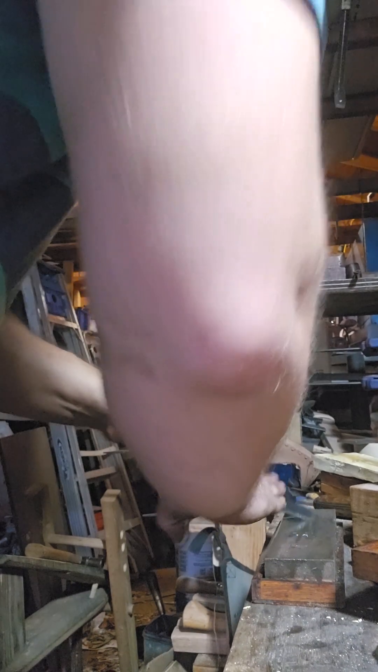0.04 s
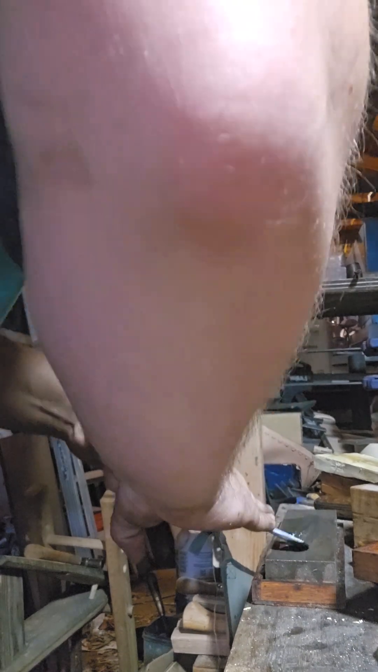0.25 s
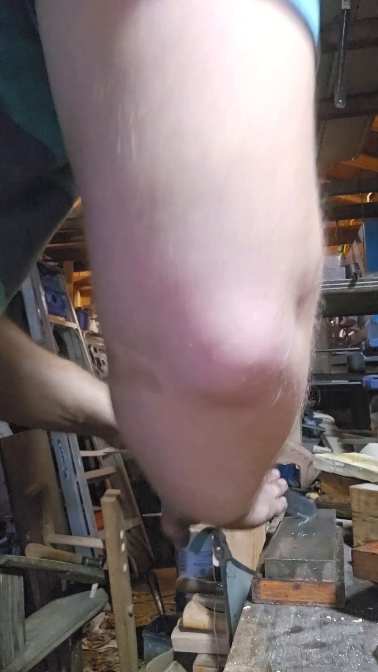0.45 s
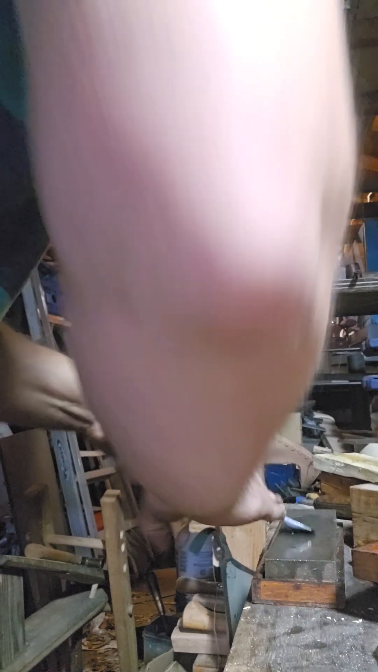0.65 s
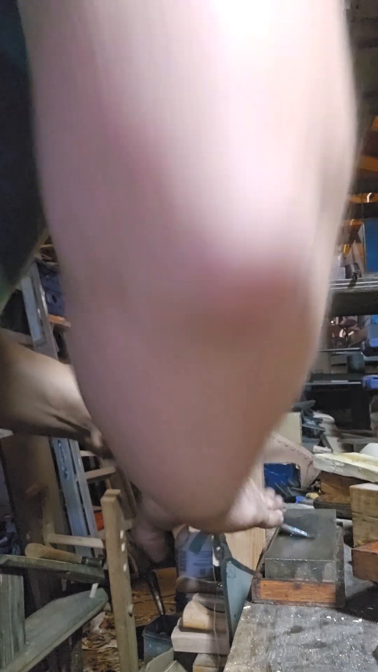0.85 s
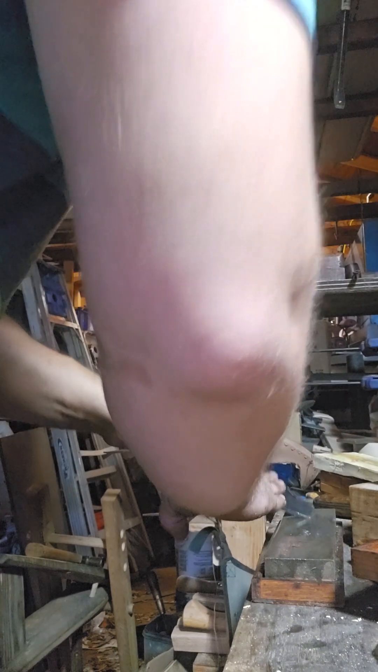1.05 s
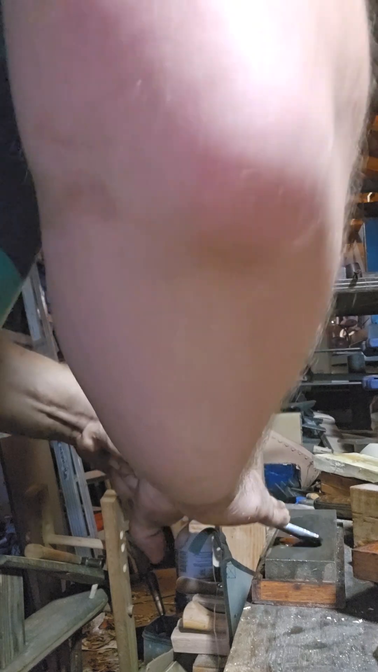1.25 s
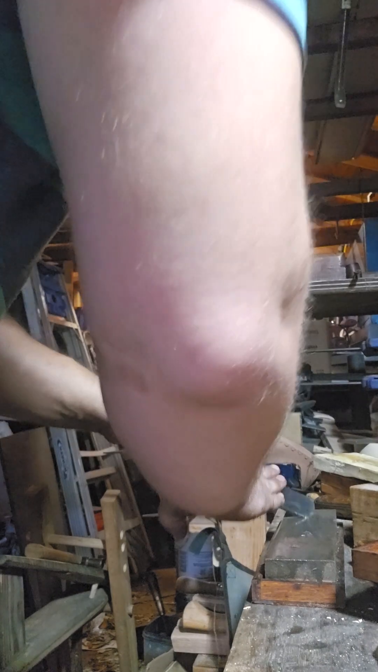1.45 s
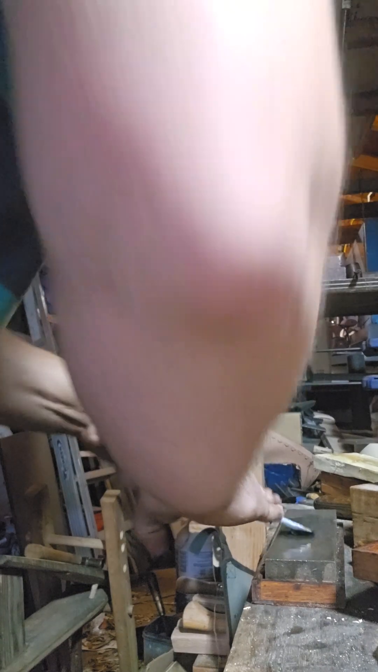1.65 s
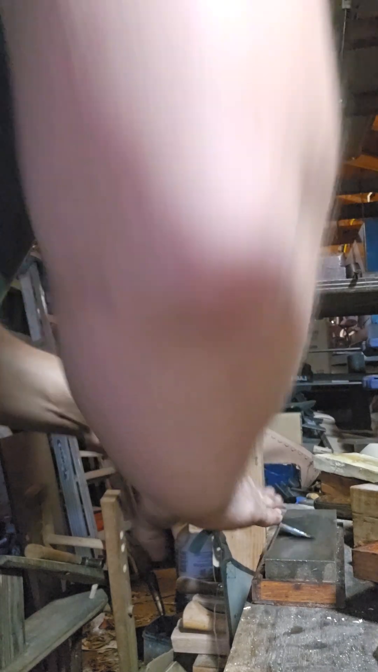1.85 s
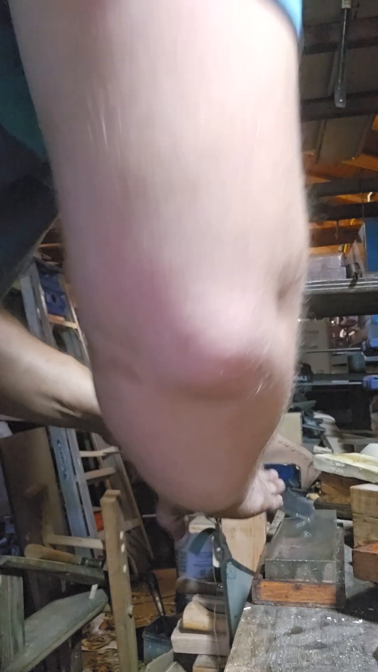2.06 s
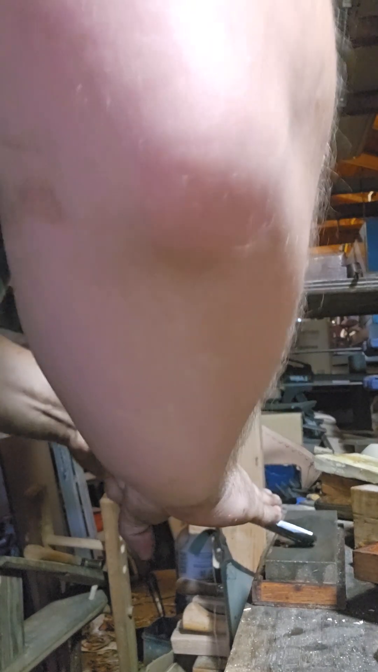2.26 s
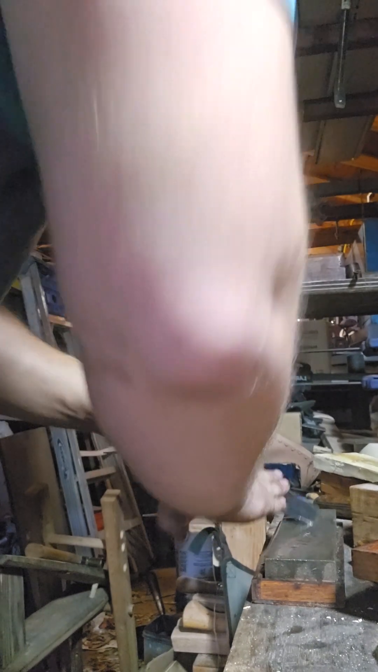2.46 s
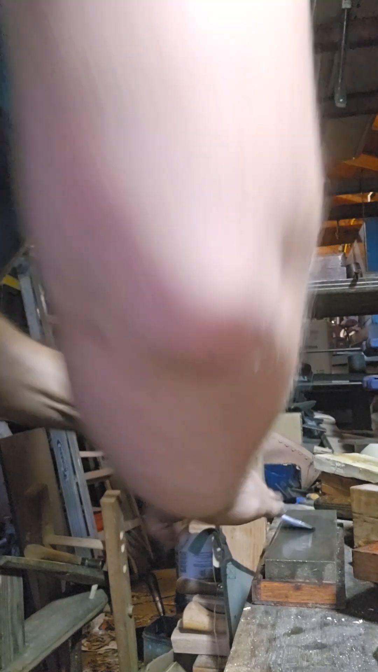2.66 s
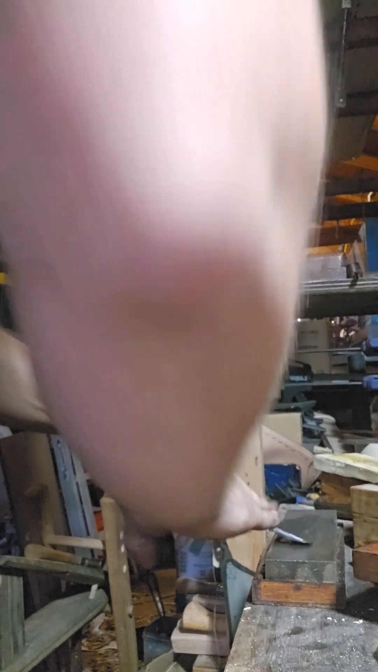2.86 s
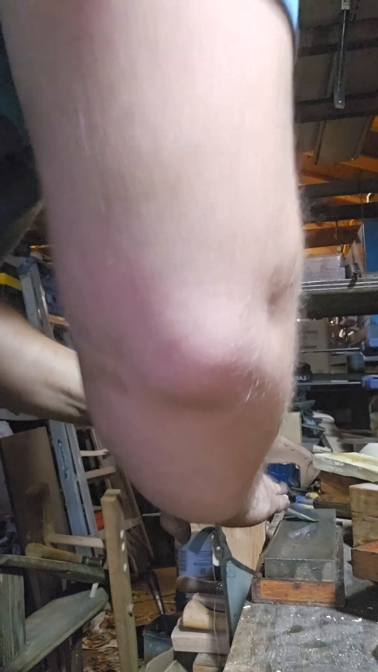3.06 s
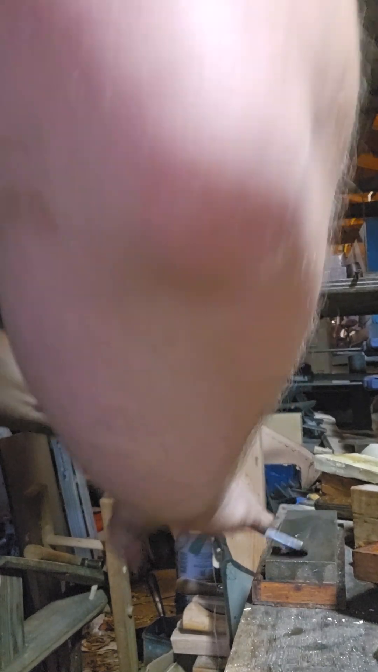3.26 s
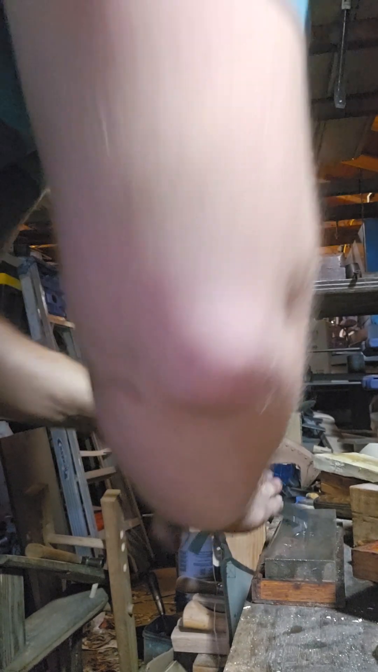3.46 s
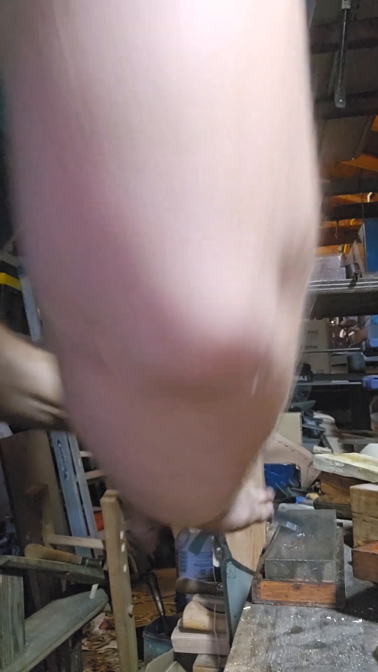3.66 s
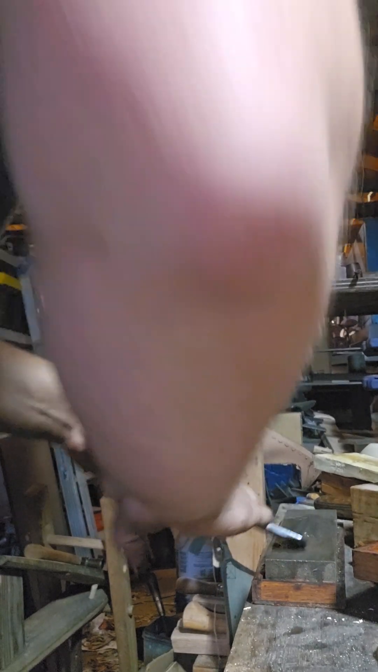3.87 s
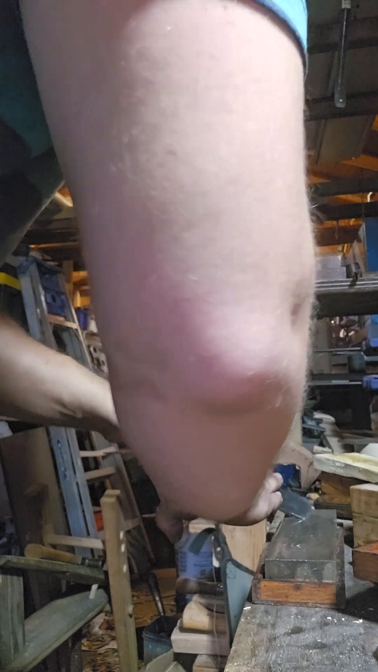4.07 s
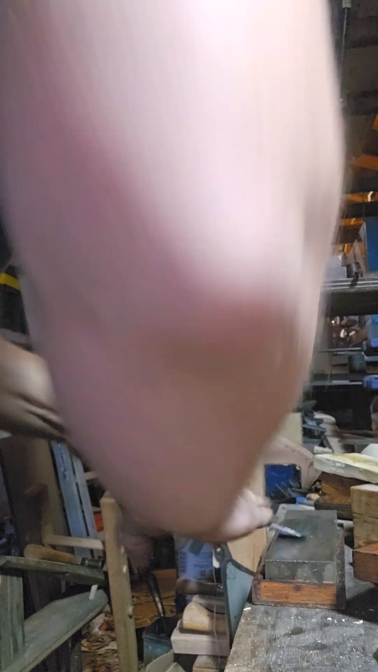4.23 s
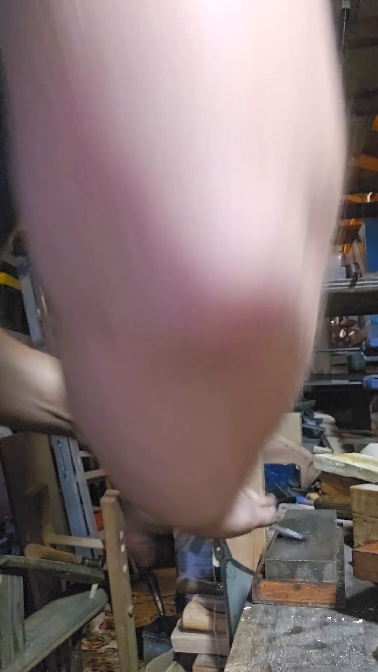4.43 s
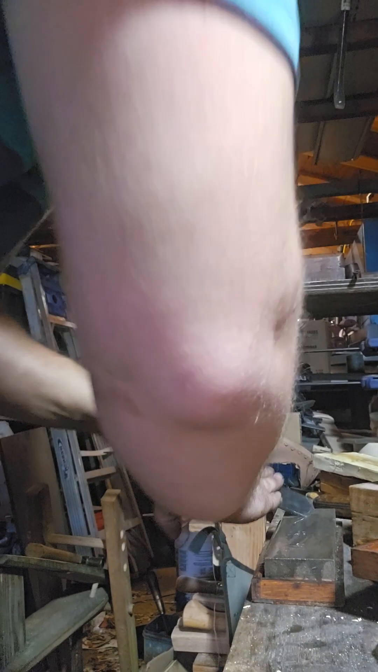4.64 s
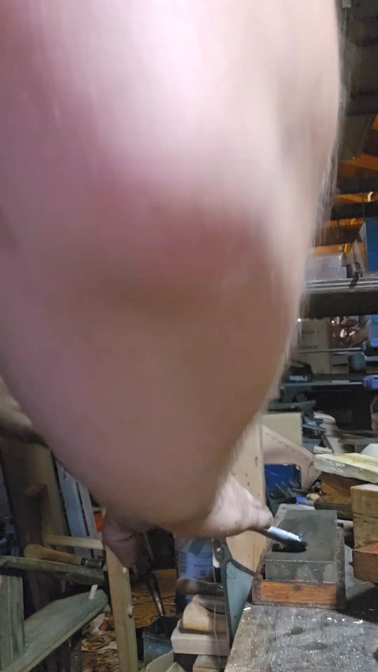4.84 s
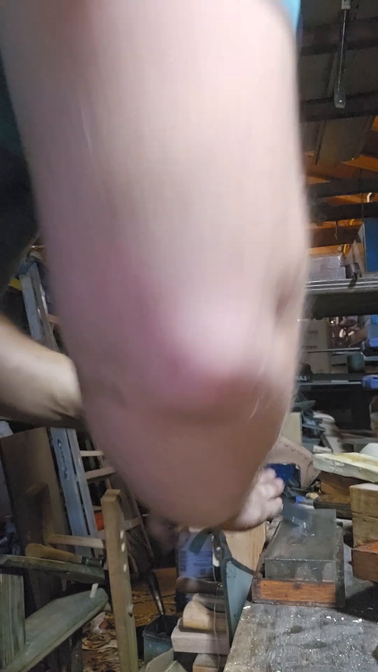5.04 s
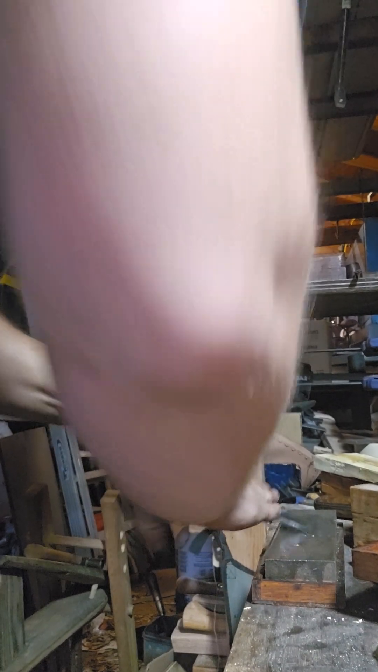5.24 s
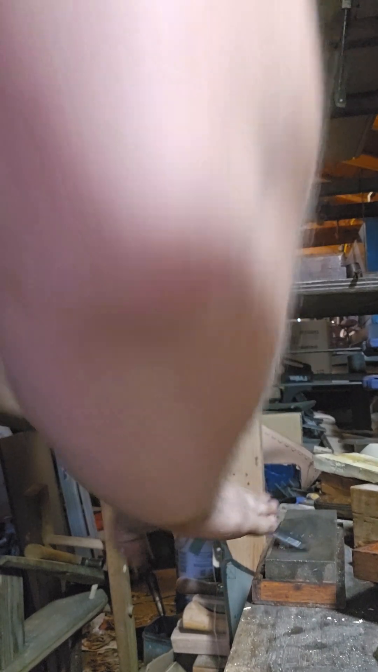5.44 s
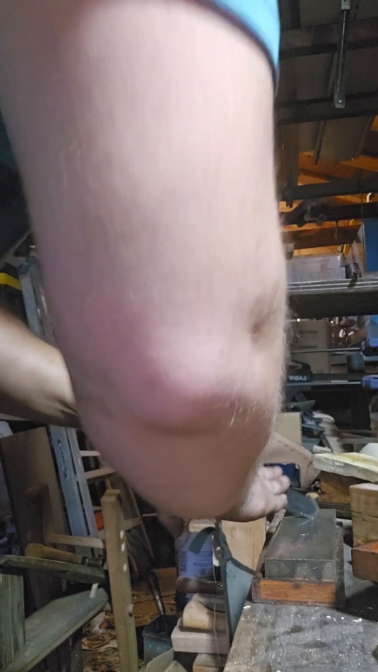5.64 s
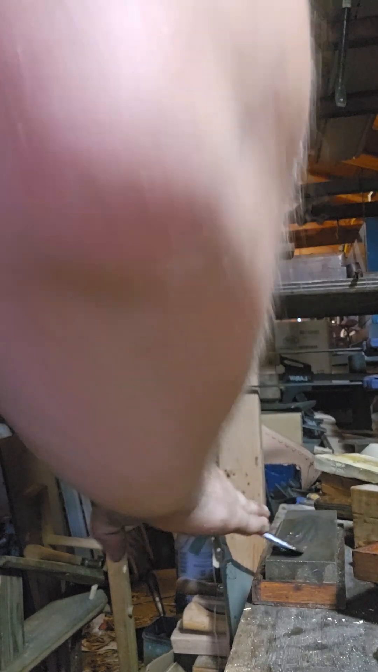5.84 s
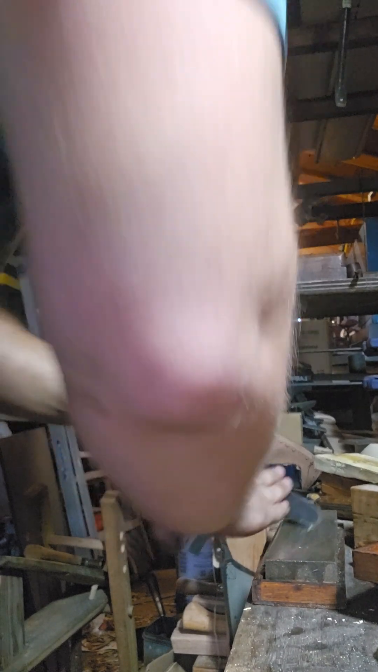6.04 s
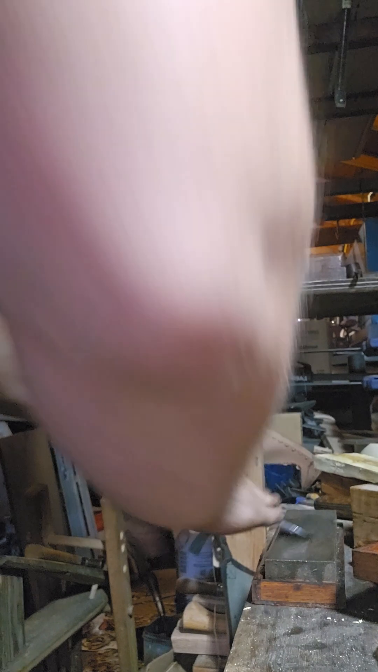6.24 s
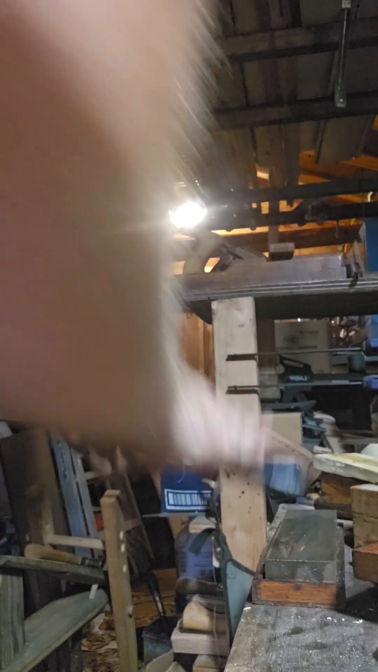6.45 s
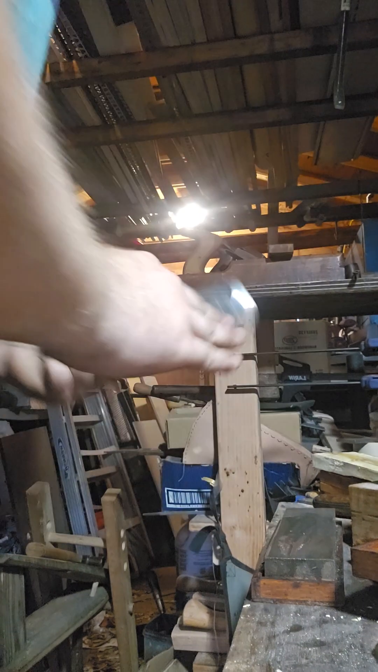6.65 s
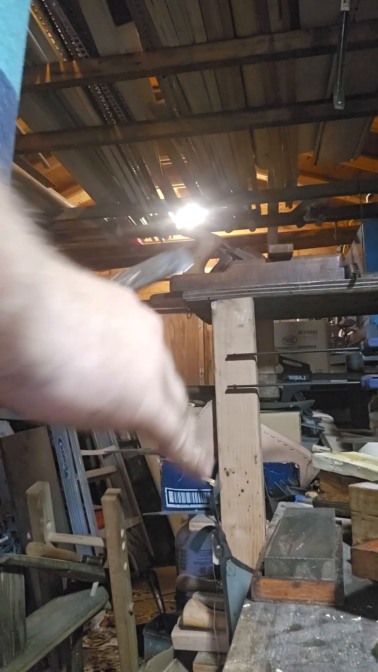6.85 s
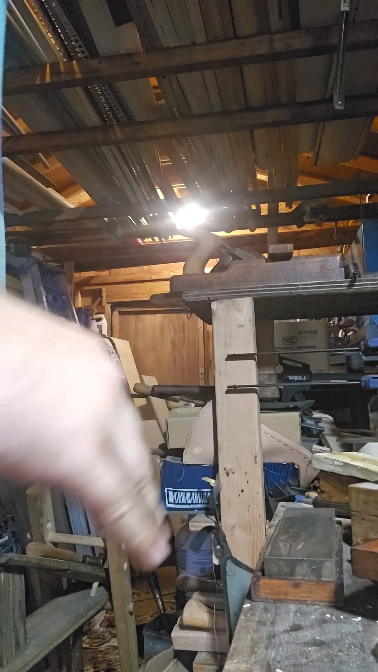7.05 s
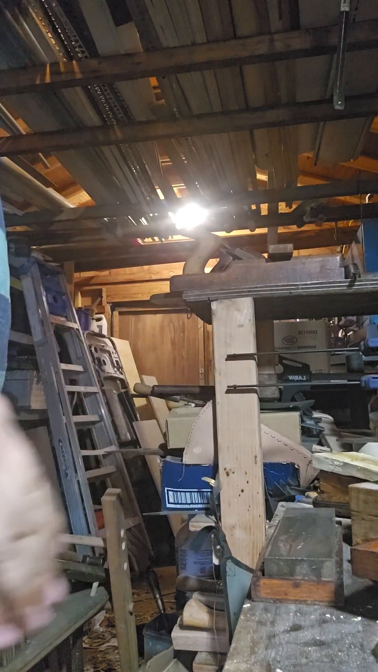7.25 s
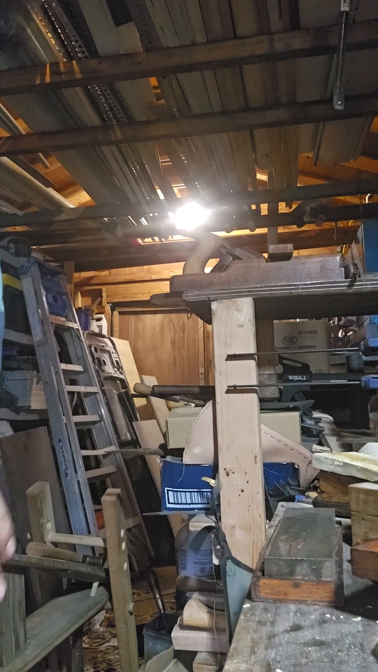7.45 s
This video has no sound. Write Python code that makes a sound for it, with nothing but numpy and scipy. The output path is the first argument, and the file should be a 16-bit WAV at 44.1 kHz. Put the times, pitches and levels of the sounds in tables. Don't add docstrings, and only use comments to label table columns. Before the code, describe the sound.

A steel blade rasps rapidly back and forth on a coarse sharpening stone, bright and gritty, then stops with a rustle and a wooden knock.

```python
import sys
import numpy as np
from scipy import signal
from scipy.fft import rfft, irfft, next_fast_len
from scipy.io import wavfile
from scipy.ndimage import uniform_filter1d, map_coordinates

SR = 44100
rng = np.random.default_rng(int(sys.argv[2]) if len(sys.argv) > 2 else 0)


def attenuation_scalar(level_db):
    decades = np.asarray(level_db, float) / 20
    return 10 ** decades


def unload_audio(sound):
    columns = np.transpose(np.atleast_2d(sound))
    steps = np.round(np.clip(columns, -1, 1) * 32767)
    wavfile.write(sys.argv[1], SR, steps.astype(np.int16))


N = 330735
SIZE = next_fast_len(N + SR)
HZ = np.arange(SIZE // 2 + 1) * SR / SIZE
TIME = np.arange(N) / SR


def colour(points_hz, points_db):
    return attenuation_scalar(np.interp(np.log(HZ + 1), np.log(points_hz), points_db))


def modes(table, order, flip):
    total = 0
    for k, row in enumerate(table):
        hz, width_hz, level_db = row[0], row[1], row[2 + order]
        total = total + flip ** k * attenuation_scalar(level_db) / (1 + 2j * (HZ - hz) / width_hz)
    return total


def shape(x, gain):
    return irfft(rfft(x, SIZE) * gain, SIZE)[..., :N]


def unit(x):
    return x / np.sqrt(np.mean(x ** 2))


def unit_power(response):
    return response / np.sqrt(np.mean(abs(response) ** 2))


def walk(rate):
    hold = int(SR / rate)
    levels = np.repeat(rng.standard_normal(N // hold + 1), hold)
    return 1.465 * uniform_filter1d(levels, hold)[:N]


def tail(t60_s, db, start_s):
    t = np.arange(SR // 2) / SR
    echoes = rng.standard_normal(len(t)) * attenuation_scalar(-60 * t / t60_s) * (t > start_s)
    return rfft(attenuation_scalar(db) * echoes / np.sqrt(np.sum(echoes ** 2)), SIZE)


def path(lag):
    direct = np.exp(-2j * np.pi * HZ * lag / SR)
    quick = tail(0.013, 1.0, 0.00046)
    room = tail(0.19, -5.0, 0.0072) / (1 + (HZ / 7000) ** 2)
    way = direct + quick + room
    return way / np.sqrt(uniform_filter1d(abs(way) ** 2, size=SIZE // 100))


def grit(rate, spread_db):
    tick = rng.random(N) < rate / SR
    return unit(tick * rng.standard_normal(N) * attenuation_scalar(spread_db * rng.exponential(size=N)))


def bursts(table):
    force = np.zeros(N)
    for start, db, length in table:
        late = np.clip(TIME - start, 0, None) / np.clip(length, 0.003, 0.09)
        snap = 1 + 1.5 * np.exp(-30 * late)
        force += (TIME >= start) * attenuation_scalar(db - 6 * late) * np.exp(-late ** 6) * snap
    return force


# frequency in Hz, level in dB.
RUMBLE_COLOUR = [(15, -32), (25, -6), (57, -12), (84, -7), (97, -9.5), (172, -14), (237, -11.5), (305, -35),
                 (600, -32.5), (780, -75), (1320, -120)]


def rumble():
    air = rng.standard_normal((3, N))
    low = unit(shape(air[0] + air[1:], colour(*np.transpose(RUMBLE_COLOUR))))
    ending_db = np.interp(TIME, [6.4, 6.6, 6.9, 7.1, 7.38, 7.48], [2.0, -2.5, 0, 1, -3.5, -5.0])
    return low * attenuation_scalar(-50.5 + 1.5 * walk(9) + ending_db)


def sway():
    start_s, end_s, floor_hz = 6.5, 7.45, 46.3
    thrum = unit(shape(rng.standard_normal(N), 1 / (1 + 2j * (HZ - floor_hz) / 16) ** 2))
    on = np.clip((TIME - start_s) / 0.08, 0, 1) * np.clip((end_s - TIME) / 0.1, 0, 1)
    return thrum * on * attenuation_scalar(-50.5) * np.array([[0.8], [1]])


# time in seconds, level in dB.
CLOTH_LEVEL = [
    (6.48, -51.5),
    (6.57, -64.5),
    (6.72, -56.5),
    (6.82, -52),
    (7.12, -57.5),
    (7.23, -63.5),
    (7.44, -61),
    (7.5, -74),
]
# frequency in Hz, left level in dB, right level in dB.
CLOTH_SPECTRUM = [(700, -14.5, -8.5), (1820, -15, -15.5), (2280, -5.5, -3), (2600, -12, -17),
                  (3400, -11.5, -9.5), (4000, -5.5, -8), (5040, -0.5, -1), (5800, -2, -9),
                  (6300, -11, -13.5), (7600, -19, -18), (9600, -38, -35), (11300, -24, -17.5),
                  (12300, -17, -24.5), (15200, -24, -33)]


def cloth():
    s, db = np.transpose(CLOTH_LEVEL)
    hz, *port_db = np.transpose(CLOTH_SPECTRUM)
    fibres = np.array([grit(14000, 1.5), grit(11000, 1.5)])
    rub = unit(shape(fibres, np.array([colour(hz, c) for c in port_db])))
    return rub * attenuation_scalar(np.interp(TIME, s, db) + 1.2 * walk(23))


# start in seconds, peak level in dB, level of the thud in dB.
KNOCK_EVENTS = [
    (6.816, -47, -68),
    (7.1516, -34, -33.5),
]


def knocks():
    crack_colour = colour([200, 600, 3000, 4200, 5400, 7000], [-16, 10, 7.5, 0, 6, -37])
    wood = modes(BENCH_MODES, order=1, flip=-0.77) * attenuation_scalar(11.0)
    out = 0
    for start, db, thud_db in KNOCK_EVENTS:
        late = np.clip(TIME - start, 0, None)
        decay = attenuation_scalar(-60 * late / 0.13) + 1.4 * attenuation_scalar(-60 * late / 0.012)
        crack = (TIME >= start) * attenuation_scalar(db - 5) * decay * grit(6800, 2.1)
        thud = (TIME >= start) * attenuation_scalar(thud_db + 15.0 - 60 * late / 0.17) * rng.standard_normal(N)
        both = shape(crack, crack_colour) + shape(thud, wood)
        out = out + shape(both, np.array([path(0), path(11)]))
    return out


def wipe():
    start_s, hold_s = 7.269, 0.14
    attack_db_s, release_db_s = 1500, 520
    before = np.clip(start_s - TIME, 0, 1)
    after = np.clip(TIME - start_s - hold_s, 0, 1)
    level = attenuation_scalar(-51 - attack_db_s * before - release_db_s * after)
    fibres = np.array([grit(12000, 1.2), grit(12000, 1.2)]) * level
    return shape(fibres, steel(1) * colour([1000, 2000, 4000, 12000], [12.5, 3.5, -2, 4]))


# start in seconds, level in dB,
# length in seconds.
BOX_SHIFTS = [
    (1.893, -47, 0.054),
    (2.8, -38.5, 0.078),
    (3.275, -38, 0.061),
    (3.955, -36, 0.059),
    (4.473, -39, 0.051),
    (5.003, -36.5, 0.05),
    (6.43, -40, 0.018),
]


def box():
    wood = colour([150, 350, 1000, 2200, 4000], [-3.0, 17, 14.5, 8.0, -7.5])
    wood = wood * (1 + attenuation_scalar(8.5) / (1 + 2j * (HZ - 490) / 40))
    return shape(bursts(BOX_SHIFTS) * grit(2000, 3.5), wood * np.array([path(18), path(0)]))


# frequency in Hz, width in Hz, left level in dB, right level in dB.
BENCH_MODES = [(101, 14, -37, -8), (134, 12, -8, 0), (250, 19.6, -5.5, 3), (346.3, 14, -5.5, -15),
               (417.4, 65, -15.5, -7), (494, 69, -16, -5.5)]


def bench_top(force):
    drag = force * attenuation_scalar(0.57 * walk(25)) * rng.standard_normal((2, N))
    left = modes(BENCH_MODES, order=0, flip=-1.02) * np.exp(-1.1j)
    right = modes(BENCH_MODES, order=1, flip=-0.97)
    body = np.array([left, right]) * colour([20, 100, 500, 900], [-34, 4, -7, -11.5])
    return shape(np.array([drag[0] + 0.64 * drag[1], drag[0]]), unit_power(body))


# start in seconds, end in seconds, rasp level at full speed in dB,
# bench level in dB.
STROKE_EVENTS = [(-0.15, 0.074, -16.5, -39.5), (0.094, 0.331, -22, -33.5), (0.343, 0.585, -24.5, -40.5),
                 (0.613, 0.84, -22, -32.5), (0.868, 1.092, -24.5, -42), (1.123, 1.349, -24.5, -32.5),
                 (1.379, 1.596, -23, -45.5), (1.618, 1.882, -24.5, -32.5), (1.888, 2.129, -24.5, -43),
                 (2.159, 2.395, -22, -32), (2.401, 2.652, -26, -40), (2.688, 2.905, -20.5, -31.5),
                 (2.925, 3.133, -24.5, -39), (3.171, 3.396, -19, -34), (3.416, 3.65, -23, -41.5),
                 (3.69, 3.915, -22.5, -33), (3.951, 4.173, -26, -43), (4.21, 4.448, -21, -33),
                 (4.456, 4.705, -23, -39.5), (4.741, 4.97, -25.5, -31.5), (4.996, 5.224, -25, -41),
                 (5.258, 5.488, -20, -33.5), (5.5, 5.727, -21.5, -39), (5.749, 5.98, -21, -29.5),
                 (5.992, 6.218, -21.5, -38), (6.242, 6.46, -20.5, -32)]


def motion():
    bite_db, brake_db = (-28, -26.5), (-27.5, -24)
    light_db_at_first, lean_in_s = -4, 2.9
    quick_turn_s, quick_turn_db = 0.025, -2.5
    jolt_s, jolt_db, jolt_fade_s = 0.0087, (-37, -30), 0.007
    rasp, bench, push, place = np.zeros((4, N))
    last_end = -1
    for k, (start, end, full_db, bench_db) in enumerate(STROKE_EVENTS):
        way = k % 2
        u = (TIME - start) / (end - start)
        light_db = light_db_at_first * np.clip(1 - start / lean_in_s, 0, 1)
        turn_db = quick_turn_db * np.clip(1 - (start - last_end) / quick_turn_s, 0, 1)
        early_db = bite_db[way] + light_db + turn_db
        late_db = brake_db[way] + 0.49 * light_db
        last_end = end
        edge = np.clip((TIME - start) / 0.0036, 0, 1) * np.clip((end - TIME) / 0.018, 0, 1) ** 0.5
        levels_db = [early_db - 6.5, early_db, full_db, late_db, late_db - 16.5]
        rasp += edge * attenuation_scalar(np.interp(u, [0, 0.15, 0.5, 0.85, 1], levels_db))
        since_jolt = TIME - start - jolt_s
        fade = np.exp(-np.clip(since_jolt, 0, 1) / jolt_fade_s)
        rasp += (TIME >= start + jolt_s) * attenuation_scalar(jolt_db[way] + light_db) * fade
        bench += edge * attenuation_scalar(bench_db) * (0.55 + 0.5 * np.sin(np.pi * np.clip(u, 0, 1)))
        now = TIME >= start
        push[now] = way
        place[now] = np.clip(u if way else 1 - u, 0, 1)[now]
    return rasp, bench, push, place


def forearm(x, place):
    treble = shape(x, np.exp(-((HZ - 6600) / 1100) ** 4))
    lifted_hz = 7300 - 1350 * uniform_filter1d(place, size=600)
    lag = 3 * SR / lifted_hz
    late = [map_coordinates(port, [np.arange(N) - lag], order=3) for port in treble]
    return x + np.array([[0.7], [0.2]]) * late


def mottle(x, patchy_db):
    out = x
    for hz in 8300 + 1300 * np.arange(6):
        band = shape(x, np.clip(1 - abs(HZ - hz) / 1300, 0, 1))
        out = out + band * (attenuation_scalar(patchy_db * np.array([walk(22), walk(22)])) - 1)
    return out


# frequency in Hz, left push level in dB, left pull level in dB,
# right push level in dB, right pull level in dB.
RASP_COLOUR = [(517, -15.5, -39, -7.5, -22), (840, -23, -21.5, -23.5, -21), (1280, -22.5, -16, -34.5, -25),
               (1773, -22, -21, -17.5, -17.5), (3235, -9, -5, -5.5, -1), (3730, -3.5, -3, 4, 2.5),
               (5525, -1, 0.5, -3, -2.5), (6120, -13.5, -13, -11.5, -13.5), (7490, -6.5, -4, -16.5, -12),
               (7820, -27.5, -26.5, -11, -12), (9670, -25.5, -43, -27.5, -21),
               (11230, -50, -24, -24.5, -41), (11880, -23.5, -24, -29.5, -21),
               (15000, -26, -22, -32.5, -38.5)]
# frequency in Hz, width in Hz, left and right level above the rasp in dB.
BLADE_MODES = [(900, 90, 2, 0), (1700, 40, 4, 1), (2030, 70, 6, 2), (2290, 80, 10, 11), (2655, 40, -3, -1),
               (3230, 70, -8, -9), (3500, 80, -1, -3), (3708, 34, 0, 7), (3940, 130, -5, -1),
               (4660, 40, -4, 0), (4795, 90, -2, 6), (5110, 90, 1, -6), (5400, 160, 0, -8),
               (6380, 110, 1, -1), (7080, 140, 0, -3), (10250, 400, -20, 2), (11700, 400, 2, 1),
               (12650, 350, 4, -4)]


def steel(way):
    hz, *port_db = np.transpose(RASP_COLOUR)
    body = []
    for port in range(2):
        ringing = 1 + modes(BLADE_MODES, order=port, flip=1)
        body.append(colour(hz, port_db[2 * port + way]) * ringing)
    return unit_power(np.array(body))


# start
# in seconds, level in dB, length in seconds.
GRAIN_CATCHES = [(.217, -19, 0.0087), (.269, -21, 0.014), (.671, -44, 0.011), (1.823, -19.5, 0.026),
                 (3.017, -27, 0.0043), (3.275, -9, 0.047), (3.522, -22, 0.013), (3.793, -26, 0.011),
                 (4.403, -18.5, 0.0061), (4.775, -23, 0.079), (4.985, -33, 0.008), (5.39, -21.5, 0.012),
                 (5.802, -23.5, 0.0083), (5.9, -29, 0.045), (6.309, -19, 0.006), (6.385, -27, 0.076)]


def blade(rasp, push, place):
    uneven = rasp * attenuation_scalar(0.4 * walk(60) + 1.58 * walk(18))
    dull = colour([400, 1300, 3000, 6000, 11000], [-9, 4.5, 2.5, 2.0, -7.0])
    coarse = shape(bursts(GRAIN_CATCHES) * grit(4000, 1.3), dull)
    force = uneven * grit(9000, 2.01) + coarse
    dust = uneven * np.array([grit(15000, 0.84), grit(13000, 1.0)])
    fine = 1 / (1 + (6500 / (HZ + 1)) ** 4)
    places = 6
    spot = np.clip(3 * place + 1 + 0.78 * walk(1.5), 0, places - 1)
    out = 0
    for way, left_lag in enumerate([30, 3]):
        body = steel(way)
        active = push != way
        out = out + shape(dust * active, body * np.sqrt(0.5 * fine))
        for k in range(places):
            share = np.sqrt(np.clip(1 - abs(spot - k), 0, 1)) * active
            ways = np.array([path(left_lag), path(0)])
            out = out + shape(force * share, body * np.sqrt(1 - 0.5 * fine) * ways)
    return mottle(forearm(out, place), patchy_db=3.0) * attenuation_scalar(-1.22)


def scene():
    rasp, bench, push, place = motion()
    sharpening = blade(rasp, push, place) + bench_top(bench) + box()
    return sharpening + cloth() + wipe() + knocks() + rumble() + sway()


def low_pass(x):
    return signal.sosfilt(signal.butter(12, 15730, fs=SR, output="sos"), x)


def record(dry):
    knee, ceiling = 0.6, 0.93
    room = ceiling - knee
    over = np.clip(abs(dry) - knee, 0, None)
    rounded = dry - np.sign(dry) * (over - room * np.tanh(over / room))
    bass_cut = signal.butter(3, 33, "high", fs=SR, output="sos")
    top_cut = signal.ellip(8, 0.5, 70, 12900, fs=SR, output="sos")
    left, right = signal.sosfilt(bass_cut, rounded)
    right = signal.sosfilt(top_cut, right)
    mix = np.clip([left, right], -1, 1)
    return low_pass(mix)


dry = scene()
out = record(dry)
unload_audio(out)
```